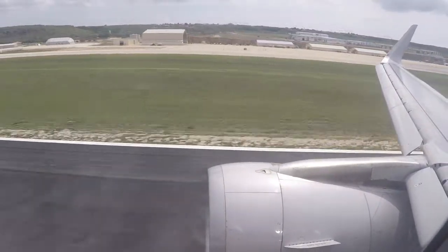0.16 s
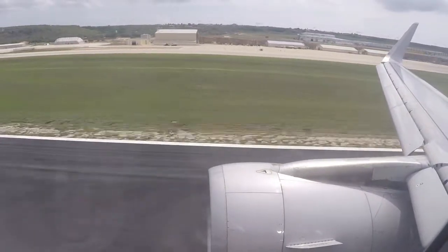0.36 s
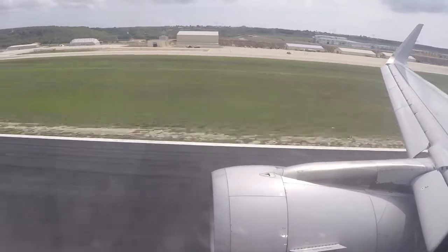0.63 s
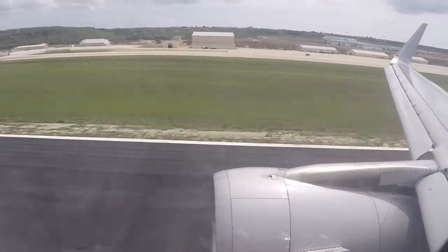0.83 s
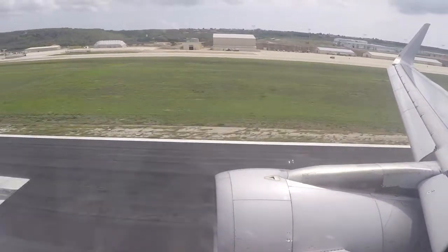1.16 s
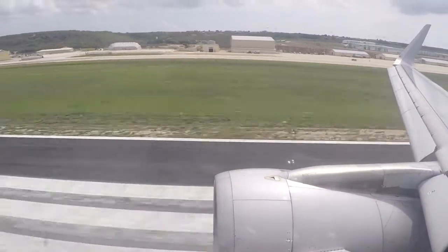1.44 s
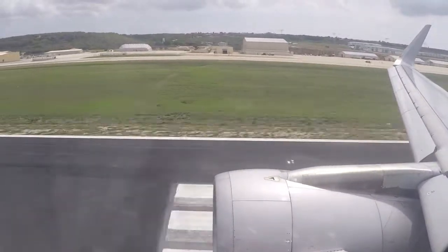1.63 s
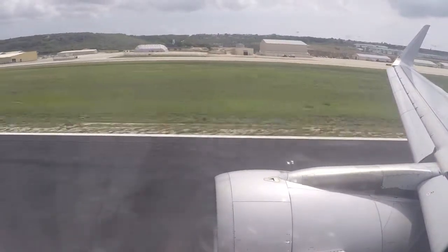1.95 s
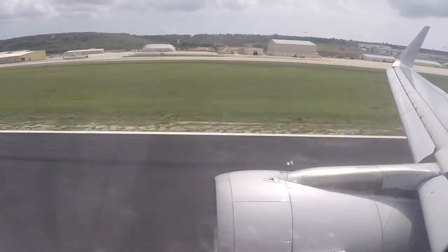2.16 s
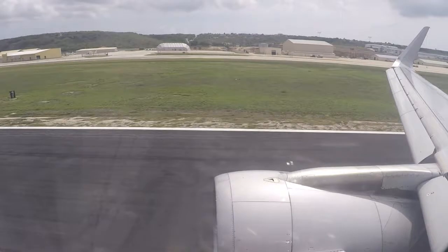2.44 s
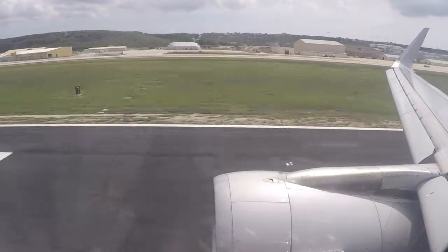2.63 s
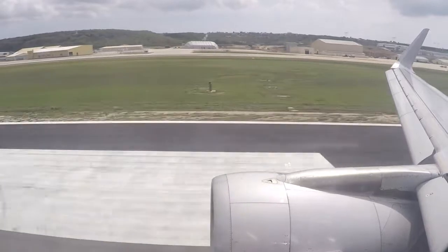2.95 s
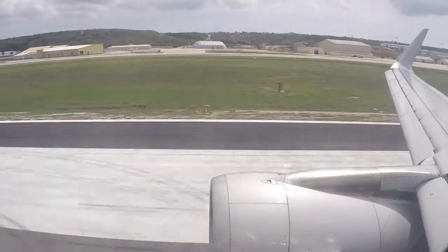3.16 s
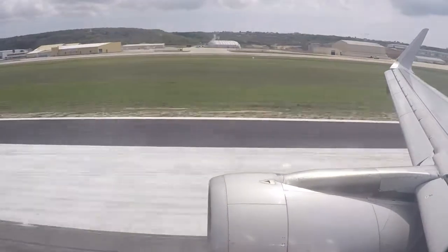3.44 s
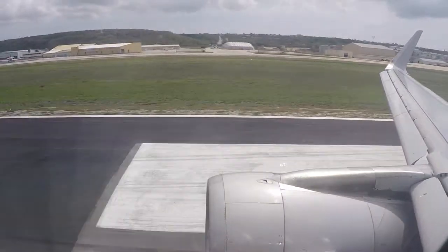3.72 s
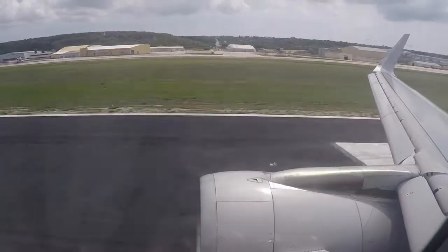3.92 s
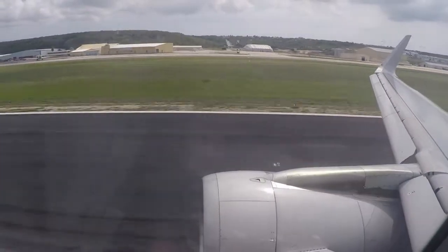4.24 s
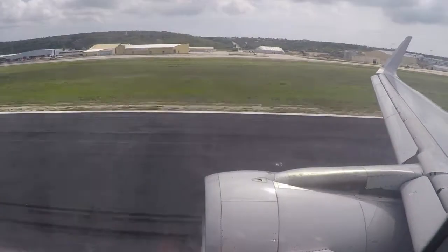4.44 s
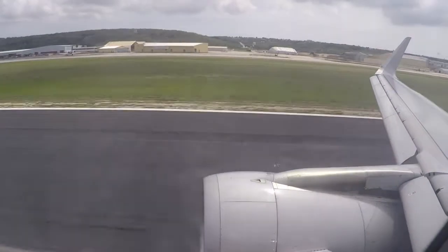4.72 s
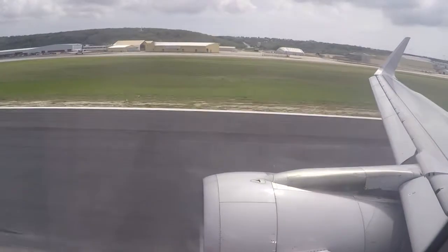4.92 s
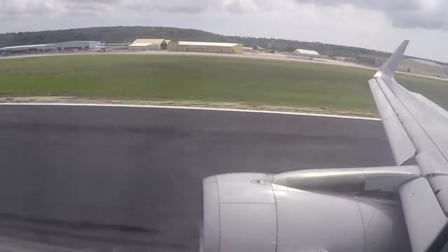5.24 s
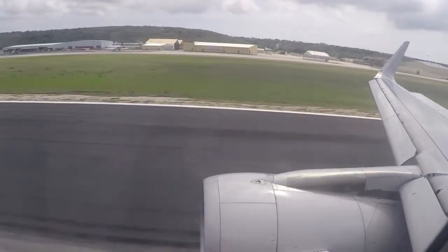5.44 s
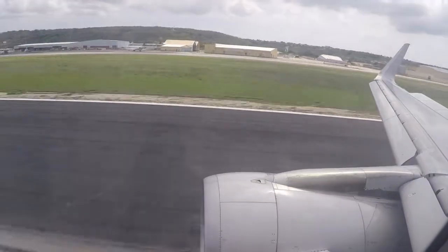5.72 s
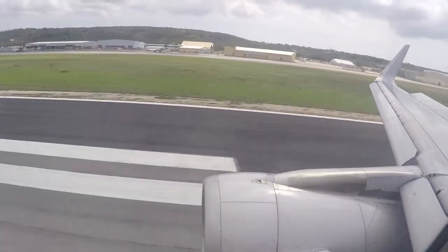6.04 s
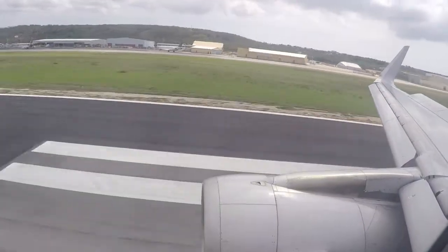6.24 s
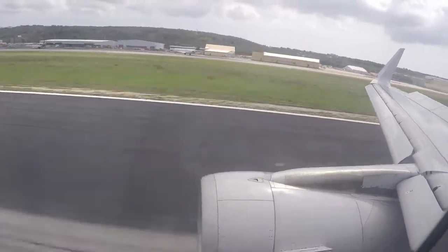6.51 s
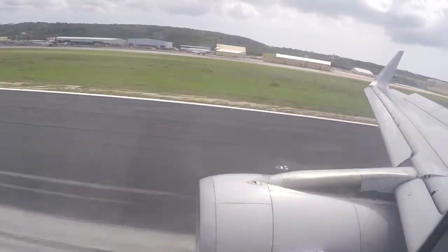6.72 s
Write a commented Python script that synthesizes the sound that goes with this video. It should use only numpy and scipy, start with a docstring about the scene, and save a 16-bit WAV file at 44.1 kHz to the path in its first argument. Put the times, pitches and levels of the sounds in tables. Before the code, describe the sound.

From the start, airflow and jet engines roar steadily over a deep rumble inside an airliner cabin. A small camera resting against the window ticks and knocks irregularly on the pane, very close and mostly lightly. At about 3.75 seconds the wheels strike with a low thud, followed by heavier thumps and a brief scrape just after 4 seconds. From 4.2 to 4.7 seconds, hard, sharp knocks with a short buzzy rattle overload the microphone. Around 5 seconds the roar and rumble dip and the knocking almost stops. From 5.6 seconds, runway joints send low jolts through the airframe, the roar comes back and the rumble grows heavier. The knocks return in a quick, uneven clatter, building to distortion again between 6.4 and 6.8 seconds, with the roar dropping slightly at the end.

```python
"""Airliner cabin at landing; a small camera rests against the window.
Approach: airflow and engines roar through the fuselage over a deep rumble. The camera ticks
and knocks on the pane, mostly lightly. From 3.75 s: the wheels strike, the airframe swings,
the case scrapes and hard knocks overload the input. Near 5 s: the level dips, the knocks pause.
From 5.6 s: runway joints jolt the airframe, the level is back and the knocks build to overload again."""
import sys
import numpy as np
from scipy import signal
from scipy.io import wavfile
from scipy.ndimage import uniform_filter1d

SR = 44100
rng = np.random.default_rng(int(sys.argv[2]) if len(sys.argv) > 2 else 0)


def materialize(psi):
    """Save the field psi as 16-bit PCM at rate SR to the path in sys.argv[1].

    A 1-D psi becomes a single channel; in a 2-D psi each row is a channel.
    """
    bounded = np.clip(np.atleast_2d(psi).T, -1, 1)
    quanta = np.round(bounded * 32767).astype(np.int16)
    wavfile.write(sys.argv[1], SR, quanta)


N = 302967

# Rumble envelopes: (time [s], airframe heave [dB], engine drone [dB])
RUMBLE_LEVELS = [(0.0, -28, -28.5), (0.6, -25.5, -27.5), (1.3, -27, -21.5), (2.0, -27.5, -23.5),
                 (2.6, -24, -27.5), (3.1, -26.5, -25), (3.9, -25, -27), (4.1, -21.5, -20.5),
                 (4.2, -24.5, -33.5), (4.48, -22, -27), (4.56, -39.5, -33.5), (4.8, -26, -34.5),
                 (5.03, -35.5, -32.5), (5.45, -22.5, -25.5), (5.8, -21.5, -18), (6.35, -17, -18.5),
                 (6.68, -18, -21), (6.74, -22, -35), (6.87, -23, -28)]
# Airframe heave: (frequency [Hz], relative density [dB])
HEAVE_SPECTRUM = [(10, -7), (20, -2), (34, -4), (45, -0.5), (62, 1), (72, -9), (90, -37), (200, -72.5)]
# Engine drone: (frequency [Hz], relative density [dB])
DRONE_SPECTRUM = [(50, -44), (66, -14.5), (76, 1.5), (88, 0), (100, -8), (125, -16.5), (150, -26.5),
                  (230, -59.5)]
# Heard level of roar and faint ticks, ducking after hard knocks, then recovering: (time [s], level [dB])
ROAR_LEVELS = [(0.0, -36), (1.17, -36.5), (1.62, -36), (4.21, -37), (4.34, -42), (4.44, -41.5), (4.78, -52),
               (5.07, -49), (5.41, -43.5), (5.89, -37), (6.58, -36.5), (6.7, -44), (6.87, -45.5)]
# Airflow and jet roar: (frequency [Hz], relative density [dB])
ROAR_SPECTRUM = [(65, -42), (110, -4.5), (167, -11.5), (206, -7.5), (249, -14), (294, -15), (486, -22.5),
                 (771, -23), (1270, -39), (1360, -39), (2290, -31.5), (6520, -55.5), (13600, -62.5),
                 (16400, -90.5)]
# Cabin and case resonances: (centre [Hz], width [Hz], gain [dB], drift on approach [dB/s])
CABIN_RESONANCES = [(151, 17, 1, 1), (205, 5, 2.5, -1.5), (215, 1.2, 7, -0.26), (289.3, 40, 7.5, -0.5),
                    (506, 30, -1.5, -0.5), (750, 80, 2.5, 0.7), (811, 7.9, 4, 3), (1258, 120, 11, 0.5),
                    (1750, 50, 8.5, 0.5), (2100, 40, 5.5, 1), (2600, 440, 0, -0.5), (3287, 890, 2, 1),
                    (4435, 250, 6, 0.5), (5575, 350, 8, -0.5), (6500, 370, 1.5, 0)]
# Camera on pane: (time [s], level [dB], slap pitch [Hz], pane share [dB])
KNOCKS = [(0.3371, -35, 2590, -20), (0.9115, -25, 2210, -1), (0.962, -27.5, 2070, -1),
          (1.2324, -21.5, 2500, -3.5), (1.3468, -21.5, 1800, 6), (1.5826, -35, 1440, 11),
          (1.5938, -12.5, 2490, -3.5), (1.6565, -24, 1940, 3.5), (1.6849, -29.5, 2470, -1),
          (1.8031, -29, 2470, -6.5), (2.2557, -29.5, 1950, 1), (2.4248, -28.5, 2070, 2.5),
          (2.4357, -29, 2430, -8), (2.4968, -20.5, 2240, -2.5), (2.7834, -18.5, 2450, -2),
          (2.9705, -31.5, 2440, 0), (3.2635, -28.5, 2350, 1), (3.3069, -28.5, 2430, -2),
          (3.3829, -31, 2060, 3), (3.413, -26.5, 2460, -1.5), (3.5578, -23, 2050, -0.5),
          (3.6361, -33, 2240, 3), (3.6962, -20, 2190, -1.5), (3.7516, -23, 2020, 6),
          (3.7675, -17.5, 2490, -5.5), (3.9506, -26, 2070, -1), (3.96, -24, 2520, -1),
          (4.0146, -18.5, 2340, -1.5), (4.0302, -30.5, 2240, -1), (4.085, -21, 2620, 1.5),
          (4.1232, -9.5, 1980, -13), (4.138, -14, 2600, -2.5), (4.1699, -19, 1800, -2),
          (4.2021, -26, 2010, 3), (4.2123, -30, 1750, -5), (4.2221, -24.5, 2050, 4), (4.2462, 9, 2510, -14),
          (4.2562, -17, 2070, -3), (4.2843, -30, 1980, 2), (4.2904, -28, 2030, -5),
          (4.3134, 4.5, 2640, -9.5), (4.3742, 2, 2600, -10.5), (4.4067, -28, 2080, -4),
          (4.4382, -29.5, 1970, 2), (4.4571, -36, 2330, 7), (4.482, 8, 2530, -14), (4.4869, -21, 2200, -15),
          (4.4966, -32, 1700, 4), (4.5055, -33, 1960, -14), (4.536, -0.5, 2540, -14.5),
          (4.5958, -40, 2200, 1), (4.6376, -21.5, 2330, 2), (4.6429, 0, 2530, -14), (4.6648, -28, 2010, -8),
          (4.7031, -2, 2590, -14), (4.7319, -16, 2500, -8), (4.7722, -37, 1830, -9),
          (4.8031, -27.5, 2480, -8), (4.8059, -27.5, 2090, -10), (4.8336, -31, 2690, -8),
          (4.8409, -41, 2340, 5.5), (5.022, -46.5, 2590, -10), (5.0893, -46, 2630, -8),
          (5.1059, -48, 1950, -18), (5.6518, -12, 2200, -13.5), (5.6754, -24, 2130, 1),
          (5.7043, -21.5, 2070, 0.5), (5.7178, -17, 2500, -4.5), (5.7516, -24.5, 2460, -3.5),
          (5.7635, -23.5, 2480, -8), (5.8753, -19.5, 2460, -5), (5.901, -14, 2480, -4),
          (5.9112, -11.5, 2410, -2), (5.9218, -23.5, 2000, 0), (5.9792, -21.5, 2100, 1.5),
          (5.9972, -15, 2520, -2.5), (6.0207, -29, 1580, -10), (6.0451, -12.5, 1900, -4),
          (6.0584, -16.5, 2700, -4.5), (6.0997, -18, 2200, -4), (6.1304, -34, 2240, 9),
          (6.1417, -21, 2220, 3), (6.1476, -16, 2510, -7), (6.1672, -25.5, 2010, -3),
          (6.2764, -34, 2650, -17), (6.3096, -33, 2600, -15), (6.3324, -7, 2200, -12),
          (6.3479, -13, 1950, -8), (6.3577, -5, 2330, -4.5), (6.3975, -14, 2100, -16),
          (6.4002, -5, 2300, -5), (6.4355, -1, 2550, -7.5), (6.4694, -36, 1630, 12),
          (6.498, 1.5, 2540, -11), (6.5077, -30, 2190, 16), (6.5287, -5.5, 2420, -4.5),
          (6.5402, -7.5, 2180, -28), (6.5446, -31, 2130, -8), (6.5711, -21, 1840, 2),
          (6.5797, -17, 2000, 9.5), (6.5951, -16, 2360, -3), (6.6014, 3.5, 2550, -16),
          (6.6343, -24, 2300, 5), (6.6407, -16, 2060, 6), (6.6461, -17, 2640, -13), (6.6666, -8, 1900, -32),
          (6.6762, 4.5, 2570, -17), (6.6935, -18.5, 2010, -6), (6.7095, -30, 2010, -3),
          (6.7744, -4.5, 2570, -12), (6.8637, -26.5, 2770, -1.5)]
# Camera case: (frequency [Hz], relative level [dB], T60 [s])
CASE_MODES = [(3342, 8, 0.0039), (4130, -2, 0.0076), (4726, -6.5, 0.0086), (5508, 8, 0.005),
              (6110, -5.5, 0.0063), (7000, -12.5, 0.008), (7950, -36, 0.0028), (10780, -21, 0.0048),
              (12600, -29, .004), (14500, -25, .003)]
# Window pane: (frequency [Hz], relative level [dB], T60 [s])
PANE_MODES = [(423.5, -3.5, 0.013), (639, -8, 0.026), (810, -2, 0.014), (1048, 3, 0.0092),
              (1404, -8.5, 0.017), (1496, -0.5, 0.011)]
# Mount parts: (frequency [Hz], relative level [dB], T60 [s])
MOUNT_MODES = [(1870, -12, 0.11), (2080, -7, .05), (2147, 2.5, 0.057), (2620, -15, 0.084)]
# Mount clasps, stirred by hard knocks: (frequency [Hz], relative level [dB], T60 [s])
CLASP_MODES = [(4250, -5.5, 0.065), (4738, -1.5, 0.055), (5380, 6, 0.03)]
# Cabin wall: (frequency [Hz], relative level [dB], T60 [s])
WALL_MODES = [(59.6, 5, 0.11), (126, -3.5, .04), (180, -6.5, 0.032), (307, -9.5, 0.021)]
# Loose trim after a knock: (frequency [Hz], relative density [dB], T60 [s])
BUZZ_SPECTRUM = [(299.4, -6.5, 0.11), (1000, -4, 0.067), (2200, 4.5, 0.023), (3500, -4, 0.039),
                 (5490, -9.5, 0.05), (8150, -20.5, 0.028), (15000, -38, .015)]
# Wheels on the runway and its joints: (time [s], level [dB], pitch [Hz])
JOLTS = [(3.753, -7.5, 57.7), (4.121, -0.5, 62.6), (4.177, -4, 55.5), (4.409, -12, 62), (4.457, -12, 51),
         (5.586, -10, 60), (5.866, -8.5, 63.7), (5.964, -4.5, 62.5), (6.23, -7.5, 52.6), (6.345, -6, 52.5),
         (6.58, -5, 61.6), (6.662, -19, 62)]
# Case sliding on the pane: (time [s], level [dB], length [s])
SCRAPES = [(4.156, -28.5, 0.06), (6.748, -40, 0.026)]
# Sliding friction: (frequency [Hz], relative density [dB])
SCRAPE_SPECTRUM = [(400, -14.5), (1500, 3.5), (3600, 2.5), (5000, -13), (8000, -18), (15000, -49)]

# Knock shares: (0 dB rim blow [dB], change per 30 dB lighter [dB], change if glancing [dB])
CASE_SHARE_DB, MOUNT_SHARE_DB, WALL_SHARE_DB = (-7.5, -7, 2), (-22.5, -3.5, 11.6), (-12.5, 2, -2)
RIM_HZ, GLANCE_HZ = 2450, 391  # slaps above RIM_HZ hit the hard rim; GLANCE_HZ lower they glance
EDGE_DB, FLAT_DB = -34, -8.5  # pane share: blow on the bare edge, blow landing flat


def gain_of(db):
    """dB to amplitude."""
    return 10 ** (np.asarray(db) / 20)


def unit_rms(x):
    """Scale to RMS 1."""
    return x / np.sqrt(np.mean(x ** 2) + 1e-20)


def log_interp(points, hz):
    """Interpolate on a log frequency axis."""
    points_hz, value = np.transpose(points)
    return np.interp(np.log(hz + 1), np.log(points_hz + 1), value)


def envelope(rows, column=1):
    """Gain curve from a dB column."""
    rows = np.array(rows)
    return gain_of(np.interp(np.arange(N) / SR, rows[:, 0], rows[:, column]))


def add(mix, start_s, sound):
    """Mix in at start_s."""
    part = mix[max(round(start_s * SR), 0):][:len(sound)]
    part += sound[:len(part)]


def noise(shape_db, fft_size, patch_db):
    """Noise shaped by shape_db(hz, time_s), with drifting random patches."""
    frames, hz = 4 * N // fft_size + 5, np.fft.rfftfreq(fft_size, 1 / SR)
    real, imag, patches = rng.standard_normal((frames, len(hz), 3)).T
    patches = uniform_filter1d(patches, size=8, axis=0)
    patches = unit_rms(uniform_filter1d(patches, size=6, axis=1))
    time_s = np.arange(frames) * fft_size / 4 / SR
    spectra = (real + 1j * imag) * gain_of(shape_db(hz[:, None], time_s) + patch_db * patches)
    return signal.istft(spectra, nperseg=fft_size, noverlap=3 * fft_size // 4)[1][:N]


def strike(modes, t, rise_s, detune):
    """One blow on damped modes, peak 1; its force is shared differently each time."""
    hz, db, t60_s = np.transpose(modes)[:, :, None]
    level_draw, pitch_draw = rng.standard_normal((2, len(modes), 1))
    decays = gain_of(db + 2.14 * level_draw - 60 * t / t60_s)
    waves = decays * np.sin(2 * np.pi * hz * (1 + detune * pitch_draw) * t)
    sound = waves.sum(0) * (1 - np.exp(-t / rise_s)) ** 2
    return sound / abs(sound).max()


def low_noise(spectrum, evenness=0.15):
    """Bass noise with chance swells; evenness 0 leaves them, 1 flattens them."""
    bass = noise(lambda hz, _: log_interp(spectrum, hz) - 60 * (hz > 230), fft_size=4096, patch_db=1)
    analytic = signal.hilbert(bass)
    power = uniform_filter1d(abs(analytic) ** 2, size=3000)
    return unit_rms(analytic.real / power ** (evenness / 2))


def rumble():
    """The airframe heaves; the engines drone just above."""
    heave = envelope(RUMBLE_LEVELS, column=1) * low_noise(HEAVE_SPECTRUM)
    drone = envelope(RUMBLE_LEVELS, column=2) * low_noise(DRONE_SPECTRUM)
    return heave + drone


def roar(touchdown_s=4.2):
    """Boundary-layer and jet noise through the skin, coloured by the cabin."""
    def shape_db(hz, time_s):
        approach_s = time_s * (time_s < touchdown_s)  # drift resets at touchdown
        cabin_db = sum((db + db_per_s * approach_s) / (1 + (2 * (hz - centre_hz) / width_hz) ** 2)
                       for centre_hz, width_hz, db, db_per_s in CABIN_RESONANCES)
        return log_interp(ROAR_SPECTRUM, hz) + cabin_db
    return envelope(ROAR_LEVELS) * unit_rms(noise(shape_db, fft_size=4096, patch_db=2))


def faint_knocks(kinds=6, damping_db_per_s=2000):
    """Faint random ticks of the camera on the pane, denser as the airframe heaves harder."""
    ticks_per_s = 5000 * envelope(RUMBLE_LEVELS, column=1) ** 2
    tick_db = 2.4 * np.minimum(rng.exponential(1, N), 2.2)
    impulses = gain_of(tick_db) * (rng.random(N) < ticks_per_s / SR)
    kind, t = rng.integers(0, kinds, N), np.arange(1500) / SR
    out = np.zeros(N)
    for k in range(kinds):
        tick = strike(PANE_MODES[2:] + MOUNT_MODES, t, rise_s=0.00011, detune=0.16)
        out += signal.oaconvolve(impulses * (kind == k), tick * gain_of(-damping_db_per_s * t))[:N]
    return gain_of(-2.5) * envelope(ROAR_LEVELS) * out


def slap(hz, t, contact_s=0.0021, t60_s=0.0052):
    """Two faces meet and part: a few cycles, then a short ring."""
    burst = np.sin(np.pi * np.clip(t / contact_s, 0, 1)) * np.sin(2 * np.pi * hz * t)
    modes = [(1.09 * hz, 0, t60_s), (0.893 * hz, 0, t60_s)]
    return burst + 0.32 * strike(modes, t, rise_s=0.0023, detune=0.018)


def wall_thump(t, push_s=0.0037):
    """The pane is pushed in: a blunt push of air, then the wall swings back."""
    push = 0.82 * np.sin(np.pi * np.clip(t / push_s, 0, 1)) ** 2
    return push - strike(WALL_MODES, t, rise_s=0.0033, detune=0.04)


def knocks():
    """Camera hits pane: a slap; case, pane and mount ring; the wall thumps; trim buzzes."""
    out, t = np.zeros(N), np.arange(4200) / SR
    blows, treble_blows = np.zeros((2, 4, N))  # four buzz tails, used in turn
    for k, (time_s, level_db, slap_hz, pane_db) in enumerate(KNOCKS):
        lightness = max(-level_db, 0) / 30
        glancing = np.clip((RIM_HZ - slap_hz) / GLANCE_HZ, 0, 1)
        flatness = np.clip((pane_db - EDGE_DB) / (FLAT_DB - EDGE_DB), 0, 1)
        case_db, mount_db, wall_db = np.dot([CASE_SHARE_DB, MOUNT_SHARE_DB, WALL_SHARE_DB],
                                            [1, lightness, glancing])
        # Light blows and flat, glancing ones barely reach the top case modes.
        tilt_db_per_oct = 6 * lightness + 42 * glancing * flatness
        modes = [(hz, db - tilt_db_per_oct * np.log2(hz / 3500), t60_s) for hz, db, t60_s in CASE_MODES]
        case = gain_of(case_db) * strike(modes, t[:900], rise_s=0.00024, detune=0.0044)
        contact = slap(slap_hz, t)
        clasps = gain_of(case_db - 25) * strike(CLASP_MODES, t, rise_s=0.0017, detune=0.0022)
        pane = gain_of(pane_db) * strike(PANE_MODES, t, rise_s=0.0003, detune=0.12)
        mount = gain_of(mount_db) * strike(MOUNT_MODES, t, rise_s=0.00053, detune=0.0017)
        wall = gain_of(wall_db) * wall_thump(t)
        add(out, time_s, gain_of(level_db) * (contact + clasps + pane + mount + wall))
        add(out, time_s, gain_of(level_db) * case)
        add(blows[k % 4], time_s, gain_of([level_db]))
        add(treble_blows[k % 4], time_s, gain_of([level_db + case_db]))
    return out + trim_buzz(blows, treble_blows)


def trim_buzz(blows, treble_blows, split_hz=3600, rise_s=0.00057):
    """Loose trim adds a short noisy tail to each knock, brighter after hard ones."""
    hz, t, spectra = signal.stft(rng.standard_normal((len(blows), 3000)), SR, nperseg=128)
    band_hz, band_db, band_t60_s = np.transpose(BUZZ_SPECTRUM)
    db = log_interp(np.c_[band_hz, band_db], hz)[:, None]
    t60_s = log_interp(np.c_[band_hz, band_t60_s], hz)[:, None]
    spectra *= gain_of(db - 60 * t / t60_s)
    low = 1 / (1 + (hz[:, None] / split_hz) ** 8)
    tails = np.array([signal.istft(spectra * band, SR, nperseg=128)[1] for band in (low, 1 - low)])
    attack = 1 - np.exp(-np.arange(tails.shape[2]) / SR / rise_s)
    tails *= attack / abs(tails[0]).max()
    buzzes = signal.oaconvolve(np.array([blows, treble_blows]), tails, axes=2)
    return gain_of(-12) * buzzes[..., :N].sum((0, 1))


def wheel_jolts(rise_s=0.0046, t60_s=0.19):
    """Each wheel strike swings the airframe for a few cycles."""
    out, t = np.zeros(N), np.arange(15000) / SR
    attack = 1 - np.exp(-t / rise_s)
    for time_s, db, hz in JOLTS:
        add(out, time_s, gain_of(db - 60 * t / t60_s) * attack * np.sin(2 * np.pi * hz * t))
    return out


def scrapes():
    """The case slides on the pane: gritty hiss, fast rise, then a fade."""
    out = np.zeros(N)
    hiss = unit_rms(noise(lambda hz, _: log_interp(SCRAPE_SPECTRUM, hz), fft_size=256, patch_db=3.5))
    for time_s, db, length_s in SCRAPES:
        progress = np.arange(round(length_s * SR)) / (length_s * SR)
        swell = np.minimum(progress / 0.25, 1) * (1 - progress) ** 1.4
        add(out, time_s, gain_of(db) * swell * hiss[round(time_s * SR):][:len(swell)])
    return out


def scene():
    """All sources at one microphone."""
    return (rumble() + roar() + knocks() + faint_knocks() + wheel_jolts() + scrapes())[None]


def record(dry, ceiling=0.97, cutoff_hz=16300):
    """Input overload near full scale, then a low-pass."""
    clipped = np.clip(dry, -ceiling, ceiling)
    lowpass = signal.firwin(511, cutoff_hz, window=("kaiser", 9), fs=SR)
    return signal.oaconvolve(clipped, lowpass[None], "same")


dry = scene()
out = record(dry)
materialize(out)
```